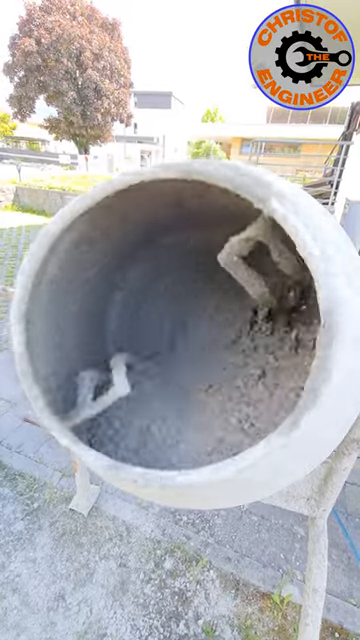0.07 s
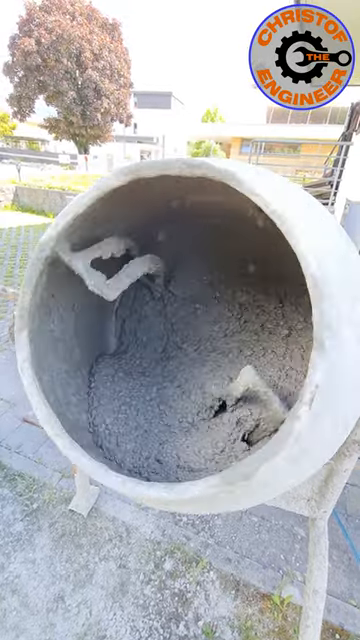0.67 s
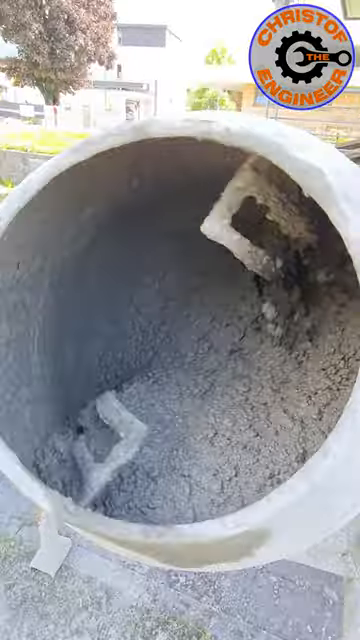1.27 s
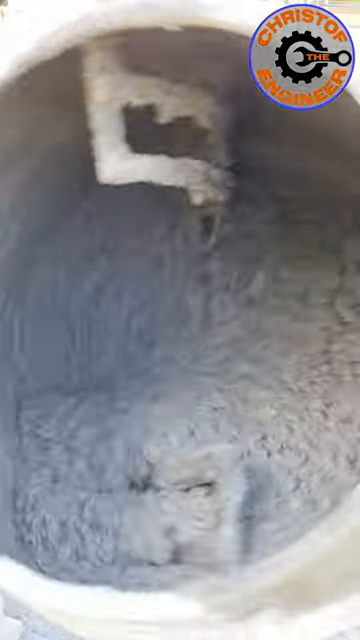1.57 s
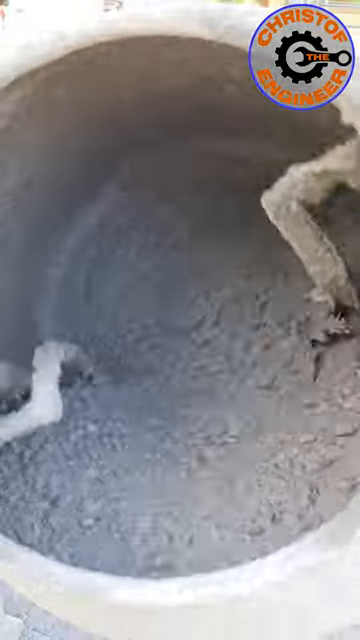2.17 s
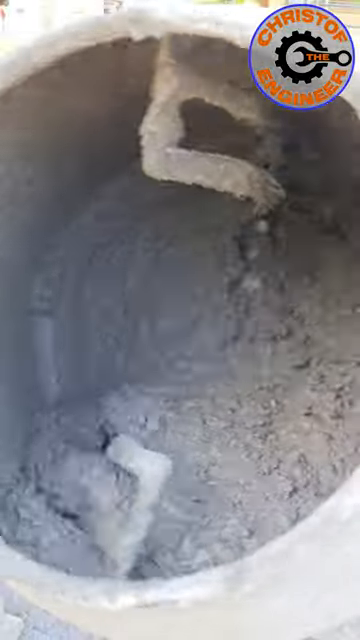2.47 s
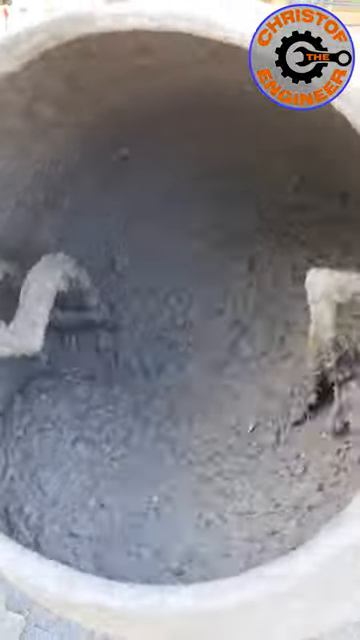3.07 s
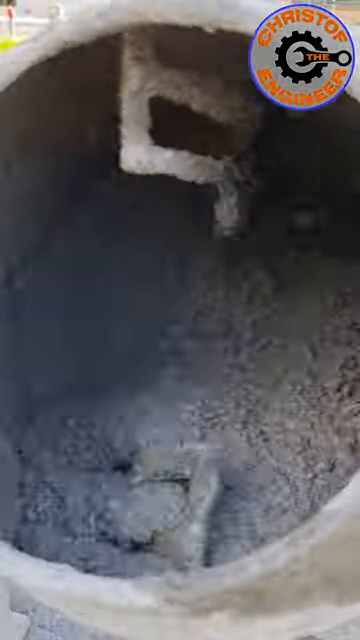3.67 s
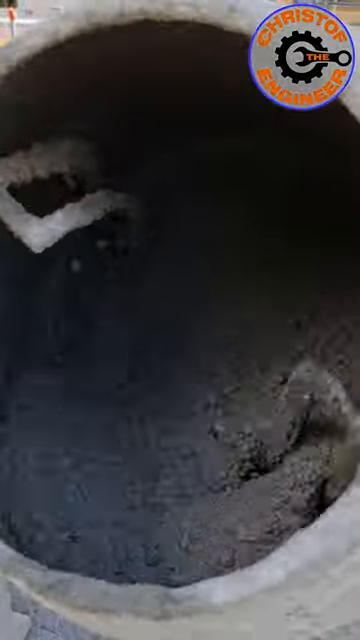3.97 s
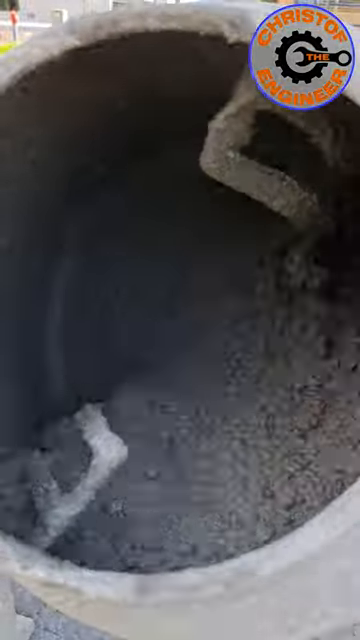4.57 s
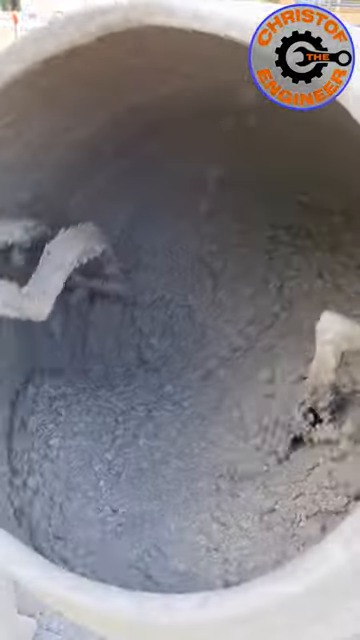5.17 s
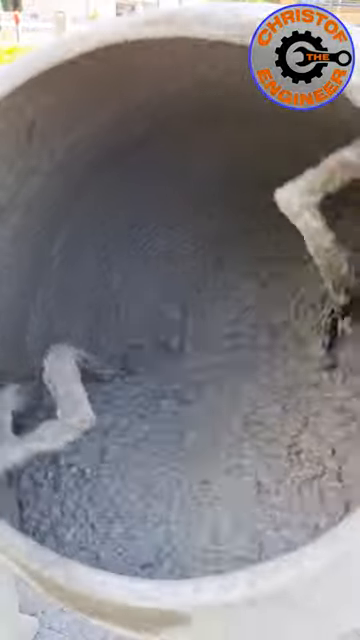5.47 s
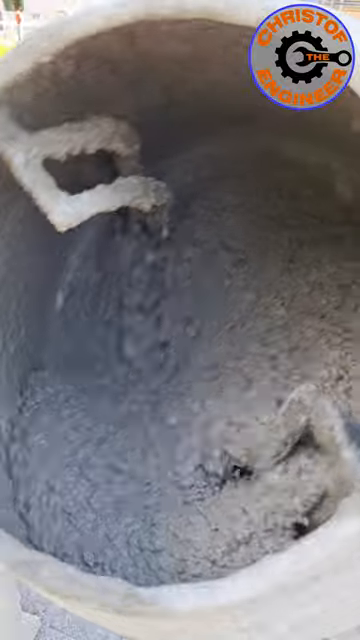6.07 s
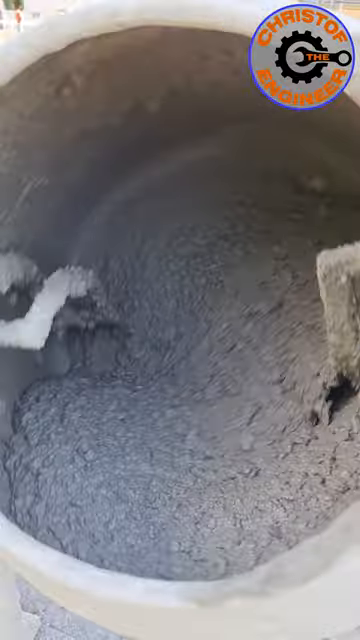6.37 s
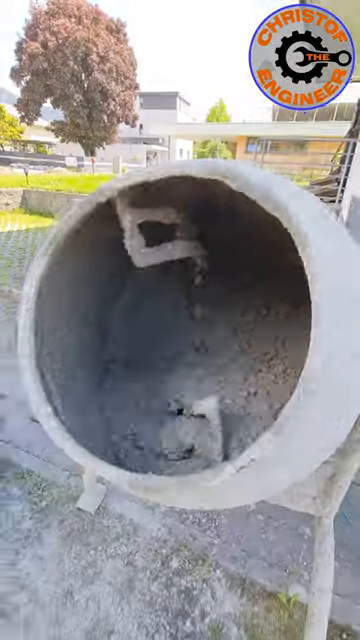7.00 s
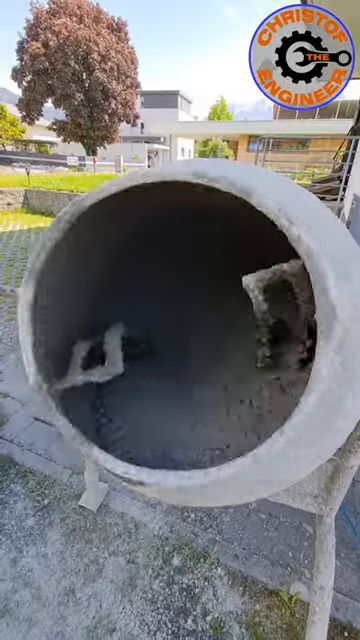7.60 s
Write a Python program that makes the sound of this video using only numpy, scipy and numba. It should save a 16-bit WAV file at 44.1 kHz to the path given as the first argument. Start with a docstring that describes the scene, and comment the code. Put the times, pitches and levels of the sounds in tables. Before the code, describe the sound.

A motorized drum mixer hums and whines as wet concrete tumbles inside, with sliding gravel, soft thuds and stone knocks.

```python
"""Drum mixer turning wet concrete

An electric mixer in an open yard, heard from just in front of its mouth. The belt drive whines and
swells once per turn of the big pulley, over the hum of the motor. About once a second a blade lifts
the mix: gravel slides down the wall, lumps flop back, stones knock and slurry spits."""
import sys
import numpy as np
from scipy import signal
from scipy.fft import rfft, irfft, next_fast_len
from scipy.io import wavfile
from scipy.ndimage import uniform_filter1d
from numba import njit

SR = 44100
rng = np.random.default_rng(int(sys.argv[2]) if len(sys.argv) > 2 else 0)


def digitize_waveform(pressure):
    """Quantize a signal to 16-bit integers and store it at the path in sys.argv[1].

    Rows of a 2-D input are taken as channels; values are limited to [-1, 1].
    """
    field = np.atleast_2d(pressure).T
    bounded = np.clip(field, -1, 1)
    quanta = np.round(bounded * 32767).astype(np.int16)
    wavfile.write(sys.argv[1], SR, quanta)


N = 345744
TIME = np.arange(N) / SR
HIT_TIME = TIME[:SR // 4]

# Each blade sheds a slide. Each row: start and length in seconds, then the levels of gravel, sand
# and rattling coarse stones in dB.
SLIDES = [(0.366, 0.37, -37, -46.5, -37.5), (1.47, 0.51, -42, -51, -53), (2.505, 0.47, -36.5, -47.5, -42.5),
          (3.6, 0.28, -40.5, -51, -50), (4.6, 0.48, -39, -49, -43), (5.935, 0.46, -41.5, -49, -59),
          (6.887, 0.4, -39.5, -47, -40)]
SLIDE_ATTACK_S, SLIDE_RELEASE_S = 0.22, 0.075


def undb(db):
    """Decibels to gain."""
    return 10 ** (np.asarray(db) / 20)


def unit(x):
    """Scale to rms 1."""
    return x / np.sqrt(np.mean(x ** 2))


def peak(x, db):
    """Scale a hit so that its crests reach the given level."""
    return x * undb(db) / np.mean(np.abs(x).max(axis=-1))


def add(out, start, hit):
    """Mix a hit in at its start time in seconds."""
    i = max(int(start * SR), 0)
    out[:, i:i + hit.shape[-1]] += hit[:, :N - i]


def curves(table):
    """Each column after the time column as an automation curve."""
    times, *columns = np.transpose(table)
    return [np.interp(TIME, times, column) for column in columns]


def walk(rate):
    """Smooth random drift: a new value `rate` times a second, spread near 1."""
    hold = int(SR / rate)
    steps = np.repeat(rng.standard_normal(N // hold + 2), hold)
    return 1.055 * uniform_filter1d(steps, hold)[:N]


def surge(start, length, attack_s, release_s):
    """An envelope that swells up to its start time, holds, then dies away."""
    return np.interp(TIME - start, [-attack_s, 0, length, length + release_s], [0, 1, 1, 0])


def colour(x, points, power=1):
    """Minimum-phase EQ through (Hz, dB) points; power scales the dB."""
    size = next_fast_len(x.shape[-1] + 4096)
    size += size % 2
    hz, db = np.transpose(points)
    bins_hz = np.maximum(np.arange(size // 2 + 1) * SR / size, 1)
    gain = undb(np.interp(np.log(bins_hz), np.log(hz), db))
    cepstrum = irfft(power * np.log(gain))
    cepstrum[1:size // 2] *= 2
    cepstrum[size // 2 + 1:] = 0
    return irfft(rfft(x, size) * np.exp(rfft(cepstrum)))[..., :x.shape[-1]]


def ring(x, hz, width_hz):
    """One resonance."""
    return signal.lfilter(*signal.iirpeak(hz, hz / width_hz, fs=SR), x)


@njit
def moving_ring(x, hz, width_hz):
    """One resonance whose centre moves, on both channels."""
    y = np.empty((2, len(hz)))
    for c in range(2):
        band, low = 0., 0.
        for i in range(len(hz)):
            tuning, damping = np.pi * hz[i] / SR, width_hz / hz[i]
            swing = (band + tuning * (x[c, i] - low)) / (1 + tuning * (tuning + damping))
            band, low = 2 * swing - band, low + 2 * tuning * swing
            y[c, i] = damping * swing
    return y


def contact_fade(t60, echo_db, echo_t60):
    """The decay of a contact and its echoes between the drum walls."""
    return undb(-60 * HIT_TIME / t60) + undb(echo_db - 60 * HIT_TIME / echo_t60)


def burst(t60, echo_db, echo_t60):
    """One contact as a fading burst of noise, in mid and side."""
    return rng.standard_normal((2, len(HIT_TIME))) * contact_fade(t60, echo_db, echo_t60)


def grains(rate, spread_db, echo_db, echo_t60):
    """Countless contacts, many small and few large, each a brief tick with its echoes in the drum."""
    chance = rng.random(N) * SR / rate
    size = (chance < 1) * undb(spread_db * np.minimum(-np.log(chance), 4))
    fade = contact_fade(0.00084, echo_db, echo_t60)
    energy = np.abs(signal.oaconvolve(size ** 2, fade ** 2)[:N])
    return rng.standard_normal((2, N)) * np.sqrt(energy)


def belt():
    """Teeth mesh in a near sine; the off-centre pulley tightens the belt each turn: louder, flatter."""
    # The pitch of the whine. Each row: time in seconds, tooth rate in Hz.
    tooth_rate = [(0, 584), (1, 583.5), (1.53, 579.5), (2.3, 584.5), (3.2, 582.4), (3.9, 580.5), (4.3, 582),
                  (5.3, 586.2), (5.9, 581), (6.64, 581.7), (7.84, 583)]
    # The load holds the pulley back or lets it run ahead. Each row: time and lag in seconds.
    pulley_lag = [(0, -0.017), (.6, -0.0036), (.95, 0.00024), (1.35, 0.0019), (1.8, .006), (2.2, .001),
                  (3.15, -0.000074), (3.5, 0.0023), (4.05, 0.0059), (4.4, -0.012), (5.1, -0.0032),
                  (5.7, -0.0035), (6.3, 0.0018), (7, -0.0054), (7.84, -0.0064)]
    # The whine at the moving listener. Each row: time in seconds, level in dB, left minus right in dB.
    whine = [(0, -24, -2), (.22, -18.5, 0), (.34, -24, 1), (.45, -20.5, -10), (.57, -19.5, 1.5),
             (.68, -21.5, -9), (.8, -24.5, -6.5), (.91, -19, 1), (1.03, -23, 2), (1.14, -18, 6),
             (1.37, -22, -7), (1.49, -20.5, 2), (1.6, -18, 1), (1.72, -21, -6), (1.95, -17, 5.5),
             (2.18, -25.5, -6), (2.29, -20.5, -6), (2.52, -23, -7.5), (2.64, -16, 3), (2.75, -19.5, -5.5),
             (2.98, -23.5, 1), (3.1, -21.5, 1.5), (3.33, -19.5, -3.5), (3.44, -18, 3), (3.56, -17, 1.5),
             (3.9, -21, -3), (4.13, -23, -8), (4.25, -24.5, 7), (4.36, -24, -2), (4.48, -17, -1.5),
             (4.59, -15.5, 0), (4.71, -29.5, -8), (4.82, -19, 3), (4.94, -22.5, -4), (5.05, -24, -3),
             (5.28, -19, 5), (5.4, -17.5, 2), (5.51, -20.5, -3.5), (5.74, -21, 0.5), (5.86, -25, 2),
             (5.97, -19.5, 4.5), (6.09, -22, 3), (6.32, -23, 3), (6.66, -20.5, 0), (6.89, -19.5, -1),
             (7.01, -18.5, 4), (7.12, -16.5, 1.5), (7.35, -24, -5.5), (7.47, -19, -1), (7.7, -15, 1),
             (7.84, -17.5, 1)]
    turn_s, first_tight_s, slack_depth = 0.115, 0.108, 0.85
    turn = 2 * np.pi * (TIME - first_tight_s - curves(pulley_lag)[0]) / turn_s
    level_db, pan_db = curves(whine)
    slack = np.sin(turn / 2) ** 2
    swell = undb(level_db) * (1 - slack_depth * slack ** 0.85)
    mesh = 2 * np.pi * np.cumsum(curves(tooth_rate)[0]) / SR - 0.36 * np.sin(turn)
    # the whine reaches the left side first, less so when it leans to the right
    lead = 1.805 + 0.21 * np.minimum(pan_db, 0)
    ears = []
    for side in (1, -1):
        phase = mesh + side * lead / 2 + 0.017 * walk(5.3) + 0.086 * walk(60)
        tone = np.sin(phase) * undb(0.97 * walk(45))
        octave = undb(-22.5 + 2.9 * walk(30)) * np.sin(2 * phase + walk(25))
        # the teeth also set a rougher ring going just above the whine
        chatter = undb(-31) * unit(ring(ring(rng.standard_normal(N), 602, 14), 632, 49))
        gain = np.sqrt(2) * swell * undb(side * pan_db / 2)
        ears.append(gain * (tone + octave) + chatter * (1 - slack / 2))
    return np.array(ears)


def motor():
    """Mains hum beats with the drive's drone and sets the drum booming, over the ring gear's rumble."""
    # Fader rides for motor and ring gear. Each row: time in seconds, level in dB.
    hum_ride = [(0, -43), (1.5, -38.5), (1.65, -28), (2.7, -36), (3.15, -31.5), (3.25, -26), (3.36, -38),
                (3.48, -27.5), (3.9, -29.5), (4.7, -31), (4.95, -40), (6.6, -36.5), (6.95, -30),
                (7.65, -27.5), (7.84, -29.5)]
    gear_ride = [(0, -46), (.25, -32), (.75, -39.5), (1.15, -32), (1.45, -40), (2.4, -39), (2.8, -36.5),
                 (3.3, -39.5), (4.7, -38), (5.1, -34.5), (5.7, -33), (6.25, -38), (6.8, -39), (7.15, -33.5),
                 (7.84, -40)]
    # The gear's low rumble. Each row: frequency in Hz, gain in dB.
    rumble_eq = [(15, -32), (30, 2), (45, 10.5), (72, 16.5), (100, 9.5), (140, 6), (300, -40)]
    mains_hz, drone_hz, boom_hz, boom_width_hz = 100, 115.3, 98, 28
    hum = np.sin(2 * np.pi * mains_hz * TIME) * np.array([[1], [.4]])
    drone = np.array([np.sin(2 * np.pi * drone_hz * TIME + 0.82 * walk(7.6)) * undb(4.6 * walk(12))
                      for _ in range(2)])
    boom = ring(rng.standard_normal((2, N)), boom_hz, boom_width_hz)
    boom = unit(ring(boom, boom_hz, boom_width_hz))
    rumble = unit(colour(rng.standard_normal((2, N)), rumble_eq))
    drive = undb(-3.5) * hum + undb(-6) * drone + undb(-9.5) * boom
    drive_db = curves(hum_ride)[0] + 2.5 * walk(14)
    rumble_db = curves(gear_ride)[0] + 1.1 * walk(7.5)
    return undb(drive_db) * drive + undb(rumble_db) * rumble


def pocket(hz, cycles, glide):
    """A pocket of air in the mix rings briefly while its pitch slides, upward for a positive glide."""
    age = TIME[:int(SR * cycles / hz)] * hz / cycles
    phase = 2 * np.pi * cycles * age * (1 + glide * age)
    return np.sin(phase) * undb(-50 * age) * (1 - np.exp(-20 * age))


def squelch(low_hz, high_hz, cycles, spread_db, count=900):
    """Small air pockets open and close all through the churning mix."""
    out = np.zeros((2, N))
    for when, pitch, size, place in rng.random((count, 4)):
        plop = pocket(low_hz * (high_hz / low_hz) ** pitch, cycles, glide=0.15) * undb(-spread_db * size)
        pan = [np.cos(2 * np.pi * place), np.sin(2 * np.pi * place)]
        add(out, when * N / SR, np.outer(pan, plop))
    return out


def tumble():
    """Soft lumps churn and squelch at the bottom, swelling whenever a mass falls off the wall."""
    # The falling masses. Each row: start and length in seconds, level in dB.
    falls = [(0.018, 0.04, -32.5), (0.235, 0.11, -35), (0.816, 0.062, -28.5), (0.974, 0.02, -25.5),
             (1.185, 0.064, -31), (1.426, 0.058, -29.5), (2.007, 0.052, -31), (2.302, 0.27, -32.5),
             (2.803, 0.14, -33), (3.008, 0.077, -27), (3.225, 0.18, -30), (4.167, 0.21, -33),
             (4.725, 0.069, -34), (4.866, 0.14, -30), (5.123, 0.095, -32.5), (5.446, 0.078, -32),
             (5.628, 0.14, -24), (5.82, 0.18, -26.5), (6.164, 0.27, -31.5), (6.536, 0.066, -28),
             (6.826, 0.024, -34), (7.586, 0.081, -35.5)]
    # The dull body of wet mix. Each row: frequency in Hz, gain in dB.
    mud_eq = [(70, -35), (130, 1.5), (200, -2.5), (290, -2), (400, 2.5), (500, -4), (750, -7.5),
              (1100, -23), (2000, -23), (5000, -55.5)]
    falling = sum((undb(db) * surge(start, length, attack_s=0.079, release_s=0.095)) ** 2
                  for start, length, db in falls)
    churning = undb(-37.5) ** 2
    level_db = 10 * np.log10(falling + churning) + 1.04 * walk(13)
    patter = unit(colour(grains(rate=900, spread_db=2.2, echo_db=-9.5, echo_t60=0.088), mud_eq))
    plops = unit(colour(squelch(low_hz=165.5, high_hz=1196, cycles=30.3, spread_db=14.5), mud_eq))
    return patter * undb(level_db - 2) + plops * undb(level_db - 4.5)


def slide_levels():
    """Gravel and sand levels in dB: each blade adds its slide to a bed that keeps moving."""
    # Clumps of grit drag along the wall. Each row: start and length in seconds, boost in dB.
    scrapes = [(0.682, .025, 2), (2.647, 0.046, 1), (3.252, 0.037, 1.5), (3.693, 0.057, 2.5),
               (4.854, 0.037, 2), (5.973, 0.097, 2.5), (7.036, 0.016, 2.5), (7.614, .03, 2)]
    # Once a drum turn little is left on the wall. Each row: start and length in seconds, sand dip in dB.
    lulls = [(0, 0.23, -1), (.8, 0.13, -2), (2.99, 0.14, -4), (5.25, 0.066, -3), (7.42, 0.11, -0.4)]
    gravel_power, sand_power = undb(-37) ** 2, undb(-44.5) ** 2
    for start, length, gravel_db, sand_db, _ in SLIDES:
        flow = surge(start, length, SLIDE_ATTACK_S, SLIDE_RELEASE_S)
        gravel_power += flow * undb(gravel_db) ** 2
        sand_power += flow * undb(sand_db) ** 2
    grit_db = 0.9 * walk(12)  # uneven flow
    grit_db += sum(db * surge(start, length, 0.022, 0.012) for start, length, db in scrapes)
    lull_db = sum(db * surge(start, length, 0.1, 0.1) for start, length, db in lulls)
    return (10 * np.log10(gravel_power) + grit_db + 0.65 * lull_db,
            10 * np.log10(sand_power) + grit_db + lull_db)


def gravel(level_db):
    """Gravel crunches down the wall and rings the drum, whose resonances the shifting load detunes."""
    # The drum's resonances. Each row: pitch and width in Hz, level in dB.
    drum_modes = [(804, 23, 0), (913, 46, 1.5), (1186, 147, -0.5), (1316, 42, 3), (1742, 147, 0),
                  (1987, 46, -3), (2130, 99, -1), (2580, 270, -9.5), (3132, 68, -6), (3710, 170, -6)]
    # The crunch of the gravel itself. Each row: frequency in Hz, gain in dB.
    crunch_eq = [(300, -6), (700, 2.5), (1020, -5.5), (1400, 0), (2200, -5), (2900, -16), (4000, -19.5),
                 (7000, -25), (12000, -54)]
    scrape = grains(rate=1400, spread_db=4.34, echo_db=-15, echo_t60=0.13)
    # the scrape keeps little above 3.3 kHz
    scrape = signal.sosfilt(signal.butter(4, 3300, fs=SR, output="sos"), scrape)
    hollow = unit(sum(undb(db) * moving_ring(scrape, hz * np.exp(0.047 * walk(5)), float(width))
                      for hz, width, db in drum_modes))
    crunch = unit(colour(grains(rate=1500, spread_db=3.9, echo_db=-13, echo_t60=0.05), crunch_eq))
    slide = unit(hollow + undb(-1.5) * crunch)
    # a faster slide is brighter as well as louder
    lows = signal.sosfiltfilt(signal.butter(2, 1500, fs=SR, output="sos"), slide)
    tilt_db = 0.26 * (level_db - np.mean(level_db))
    return (lows * undb(-tilt_db) + (slide - lows) * undb(tilt_db)) * undb(level_db + 2)


def sand(level_db):
    """Wet sand slides off the wall and the blades in a flickering hiss of tiny contacts."""
    # The bright hiss. Each row: frequency in Hz, gain in dB.
    hiss_eq = [(1500, -16), (2900, -5.5), (3700, 1), (4400, 2.5), (4950, -0.5), (5800, 0.5), (7000, -4.5),
               (8000, -14), (9300, -20.5), (11000, -13.5), (13000, -14.5), (16000, -18)]
    hiss = unit(colour(grains(rate=2500, spread_db=3.06, echo_db=-11, echo_t60=0.14), hiss_eq))
    return hiss * undb(level_db + 0.91 * walk(22))


def bongs():
    """Heavy clods set the steel shell ringing."""
    # Each row: start in seconds, peak in dB.
    clods = [(0.035, -40), (0.505, -27), (1.415, -25), (2.865, -24), (4.21, -31), (5.69, -27), (5.941, -24),
             (6.84, -28)]
    shell_hz = 802
    out = np.zeros((2, N))
    for start, db in clods:
        push = burst(t60=.04, echo_db=-20, echo_t60=.1)
        bong = ring(ring(push, shell_hz, width_hz=81), shell_hz, width_hz=330)
        add(out, start, peak(bong, db))
    return out


def lumps():
    """Lumps flop back into the mix with a hollow thud and a wet slap."""
    # Each row: start in seconds, level in dB, pitch in Hz, slap offset in dB, thud decay in seconds.
    flops = [(0.04, -25, 600, -12, .04), (0.124, -19.5, 385, -16, .04), (0.23, -12.5, 400, -12, 0.05),
             (0.268, -21, 300, -9, .03), (0.333, -19, 405, -20, .05), (0.44, -17, 398, -18, 0.036),
             (0.503, -14, 500, -12, .04), (0.81, -17, 258, -18, 0.066), (0.828, -23, 370, -16, .05),
             (0.894, -20, 258, -26, 0.07), (0.976, -12.5, 330, -11, .08), (0.991, -13.5, 340, -6.5, 0.06),
             (1.236, -18.5, 480, -20, .05), (1.415, -20, 395, -17, 0.08), (2.017, -23, 185, -10, .04),
             (2.835, -16, 347, -8, 0.044), (2.868, -22, 420, -16, .04), (2.879, -12, 634, -12, 0.029),
             (3.013, -13, 252, -17, 0.045), (3.042, -19, 415, -20, 0.066), (3.273, -17, 375, -19, .04),
             (4.21, -18.5, 220, -12, 0.072), (4.746, -13, 282, -18, 0.044), (4.78, -17.5, 200, -19, .04),
             (4.907, -16, 300, -24, .045), (4.955, -18, 385, -22, .05), (5.03, -11, 355, -15, 0.098),
             (5.184, -24, 366, -22, .05), (5.49, -22, 300, -20, .05), (5.586, -21, 620, 0, .08),
             (5.603, -11, 530, -6, 0.05), (5.615, -14, 400, -5, 0.065), (5.667, -18, 750, -8, 0.065),
             (5.688, -10, 390, -8, 0.09), (5.723, -12, 390, -21, 0.087), (5.752, -16.5, 433, -11, .05),
             (5.815, -18.5, 739, -9, 0.068), (5.944, -17.5, 350, -6, 0.078), (6.395, -19.5, 255, -12, .05),
             (6.548, -18, 400, -8, .06), (6.588, -19.5, 315, -5.5, 0.069), (6.849, -17, 200, -21, 0.064)]
    # The midrange slap. Each row: frequency in Hz, gain in dB.
    slap_eq = [(300, -48), (750, -0.5), (1200, 3), (1800, -3.5), (3000, -48), (8000, -56)]
    landing = np.minimum(HIT_TIME / 0.0037, 1)  # a soft lump takes a moment to flatten
    out = np.zeros((2, N))
    for start, db, hz, slap_db, decay_s in flops:
        flop = burst(decay_s, echo_db=-13, echo_t60=.13) * landing
        thud = ring(ring(flop, hz, width_hz=160), hz, width_hz=770)
        slap = colour(burst(t60=.15, echo_db=-18, echo_t60=.11), slap_eq)
        add(out, start, peak(thud, db - 2.5) + peak(slap, db + slap_db))
    return out


def rattle():
    """Coarse stones lead each slide, rattling the steel; the ring sinks and fades as mix covers it."""
    ring_hz, width_hz, sag_hz_per_s, fade_db_per_s = 2190., 530., 470, 16
    gain, hz = np.zeros(N), np.full(N, ring_hz)
    for start, length, _, _, db in SLIDES:
        age = np.clip(TIME - start, 0, length)
        flow = surge(start, length, SLIDE_ATTACK_S, SLIDE_RELEASE_S)
        gain += flow * undb(db - fade_db_per_s * age)
        hz -= flow * sag_hz_per_s * age
    clatter = grains(rate=350, spread_db=2.3, echo_db=-9, echo_t60=0.19)
    for _ in range(2):
        clatter = moving_ring(clatter, hz * np.exp(0.02 * walk(14)), width_hz)
    return gain * unit(clatter)


def pops():
    """Single air pockets pop in the mix, each falling in pitch."""
    # Each row: start in seconds, peak in dB, opening pitch in Hz, length in cycles of that pitch.
    pockets = [(0.231, -18, 436, 23), (0.504, -21, 760, 9), (0.9572, -9, 530, 5), (0.96, -13, 320, 4.5),
               (2.298, -16, 255, 4.1), (2.771, -17, 270, 5.2), (2.794, -20, 190, 5.5),
               (2.836, -17.5, 360, 13), (3.02, -20, 490, 7.6), (3.07, -12.5, 765, 8.6),
               (3.12, -21.5, 224, 8.8), (4.22, -20, 202, 6.8), (4.9163, -16.5, 310, 5.9),
               (5.6165, -11.5, 1140, 17), (5.623, -18, 1700, 18), (5.6883, -16, 500, 9.1),
               (5.723, -16, 480, 10), (6, -17, 380, 5), (6.24, -20.5, 193, 7)]
    out = np.zeros((2, N))
    for start, db, hz, cycles in pockets:
        add(out, start, peak(pocket(hz, cycles, glide=-0.2), db) * np.array([[1], [.4]]))
    return out


def spits():
    """Slurry spits, its droplets landing over a few milliseconds."""
    # Each row: start in seconds, level in dB.
    splashes = [(0.2922, -31), (0.6684, -38), (0.9103, -32), (1.265, -37), (1.5853, -36), (1.8002, -32),
                (1.8373, -30), (1.866, -37), (2.8115, -34), (2.9136, -31), (5.8326, -33), (6.333, -31),
                (7.212, -33), (7.2788, -32), (7.3432, -27), (7.4053, -37)]
    # The thin, bright spray. Each row: frequency in Hz, gain in dB.
    spray_eq = [(2000, -18), (5000, 11), (7000, 5), (9000, -8), (12000, 0), (16000, -3)]
    out = np.zeros((2, N))
    for start, db in splashes:
        spray = burst(t60=.045, echo_db=-16, echo_t60=.08) * np.minimum(HIT_TIME / .002, 1)
        add(out, start, peak(colour(spray, spray_eq), db + .5))
    return out


def stones():
    """Single stones knock on the steel: a hard snap and a short ring."""
    # Each row: start in seconds, ring peak in dB, pitch and width in Hz, snap in dB against the ring.
    knocks = [(0.385, -23, 2200, 350, -18), (0.407, -20, 2170, 350, -18), (0.432, -22, 2300, 400, -12),
              (0.674, -29, 5700, 400, -16), (0.689, -25.5, 4880, 600, -14), (0.695, -23, 2130, 350, -14),
              (1.434, -23, 1840, 900, -15), (1.655, -32, 4680, 700, -10), (1.918, -26, 4200, 900, -3),
              (1.9987, -15.5, 2220, 350, 2.5), (2.841, -24, 1640, 300, -12), (2.885, -22, 1940, 900, -8),
              (3.26, -32, 3150, 700, -8), (3.704, -26, 3770, 110, -3), (3.719, -25, 3680, 300, -2),
              (4.8586, -19, 1600, 600, -8), (4.879, -27, 3760, 500, -8), (5.6142, -13, 1690, 70, -22),
              (6.095, -27, 4250, 700, -8), (6.864, -24, 2150, 800, -12), (7.0408, -23, 2100, 500, -8)]
    # The tone of the ring and of the snap. Each row: frequency in Hz, gain in dB.
    ring_eq = [(300, -37), (1200, 15), (2300, 21), (4500, 18.5), (6000, 2), (7500, -26), (9000, -28),
               (15000, -30)]
    snap_eq = [(600, -38), (1500, 3), (4300, 2), (5600, -4), (7000, -25), (15000, -38)]
    out = np.zeros((2, N))
    for start, db, hz, width, snap_db in knocks:
        knock = burst(t60=.009, echo_db=-15, echo_t60=.08)
        clink = colour(ring(knock, hz, width), ring_eq)
        snap = colour(knock, snap_eq)
        add(out, start, peak(clink, db) + peak(snap, db + snap_db))
    return out


def scene():
    """The sound spreads wide across the stereo field; the treble leans to the right."""
    # Stereo width. Each row: frequency in Hz, gain of the side channel in dB.
    width_eq = [(30, -3.5), (60, 1), (100, -14.5), (170, 2), (260, 1), (420, 4.5), (750, 4), (920, -2.5),
                (1180, 3.5), (1700, -1.5), (2250, -1.5), (2950, 4), (4100, -2), (5000, 1.5), (6500, 0),
                (15000, 0)]
    # Stereo balance. Each row: frequency in Hz, left minus right in dB.
    lean_eq = [(100, -1), (1800, -1.5), (2500, -1.5), (3700, -1), (5000, -2), (6500, -7.5), (9000, -5.5),
               (11000, -8), (15000, 1)]
    gravel_db, sand_db = slide_levels()
    bed = motor() + tumble() + gravel(gravel_db) + sand(sand_db) + rattle()
    hits = bongs() + lumps() + pops() + spits() + stones()
    mid, side = bed + hits
    side = colour(side, width_eq)
    left = colour(mid + side, lean_eq, power=.5)
    right = colour(mid - side, lean_eq, power=-.5)
    return np.array([left, right]) + belt()


def record(dry):
    """A steep low-pass trims the highest treble."""
    top_hz = 15600
    return signal.sosfilt(signal.ellip(10, .2, 80, top_hz, fs=SR, output="sos"), dry)


dry = scene()
out = record(dry)
digitize_waveform(out)
```